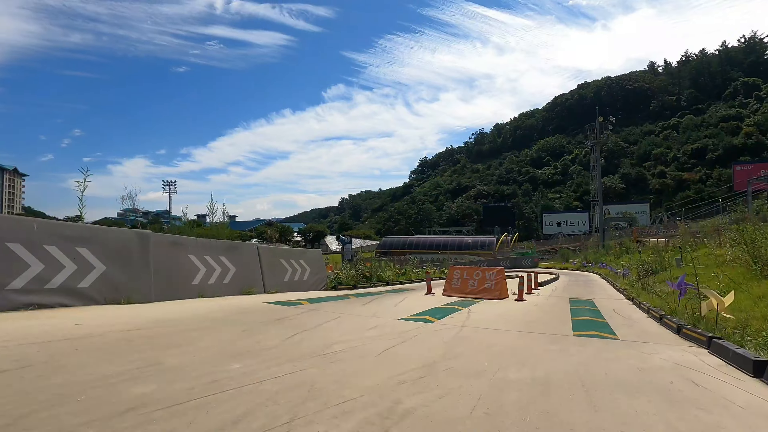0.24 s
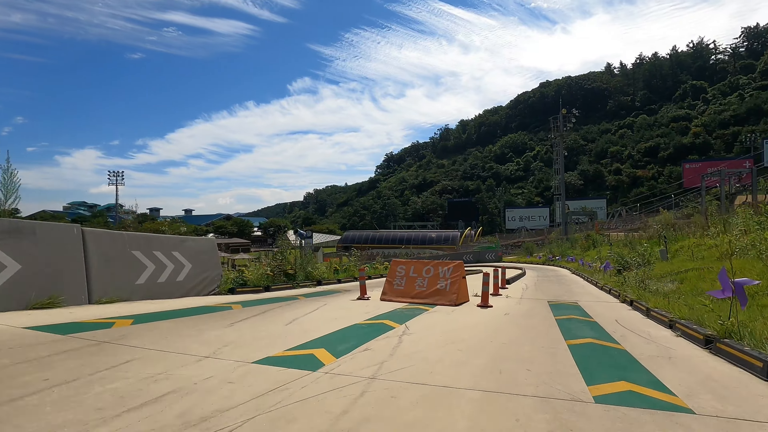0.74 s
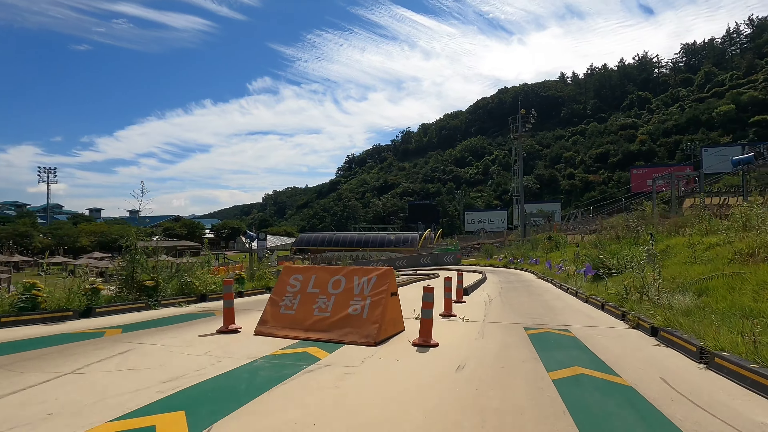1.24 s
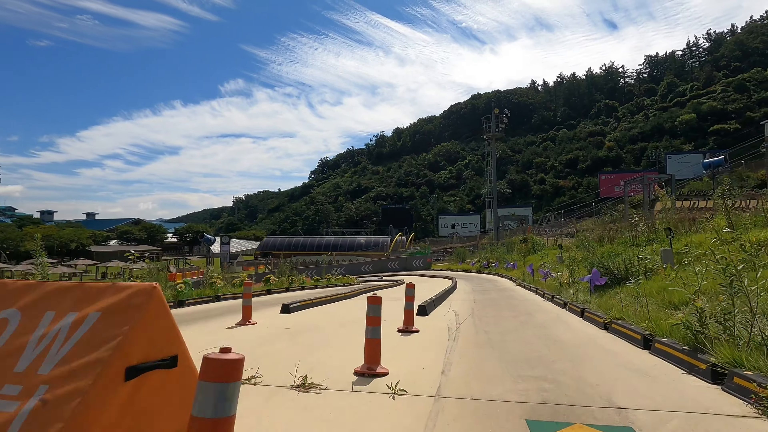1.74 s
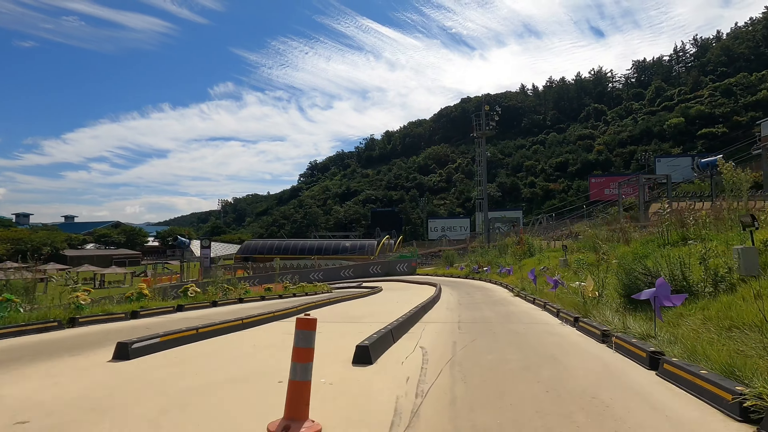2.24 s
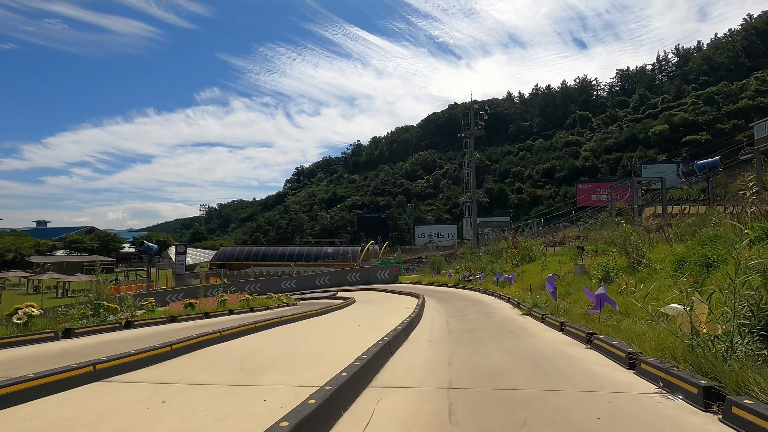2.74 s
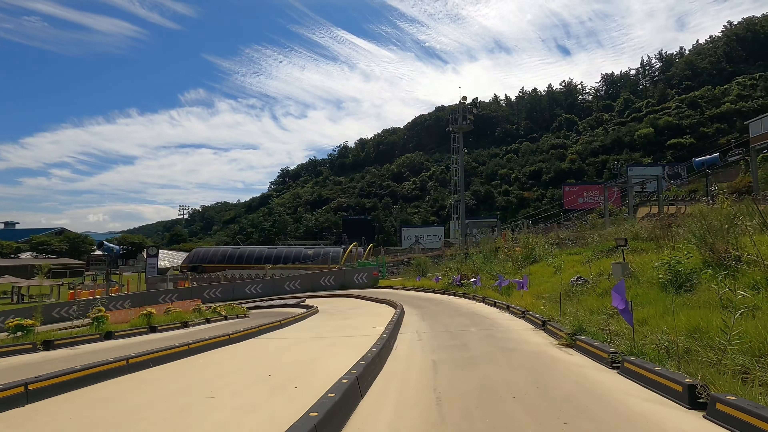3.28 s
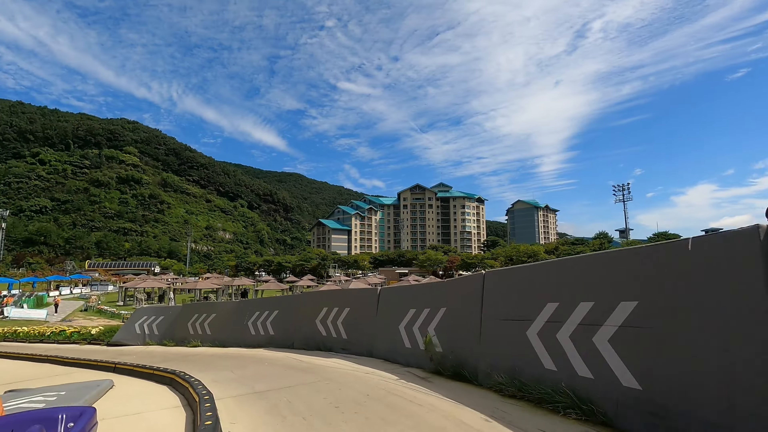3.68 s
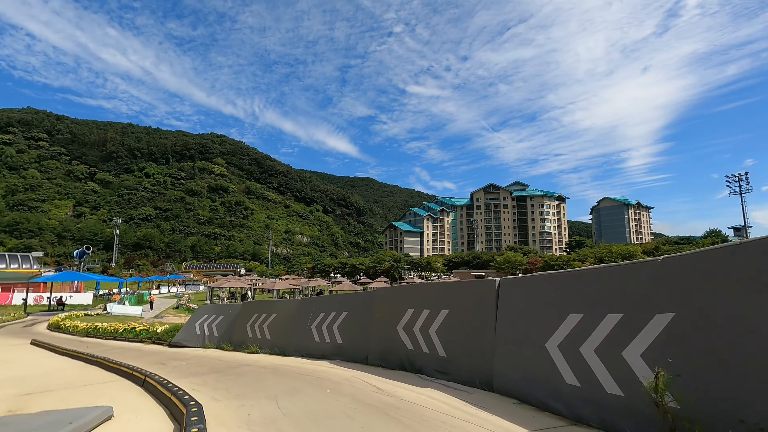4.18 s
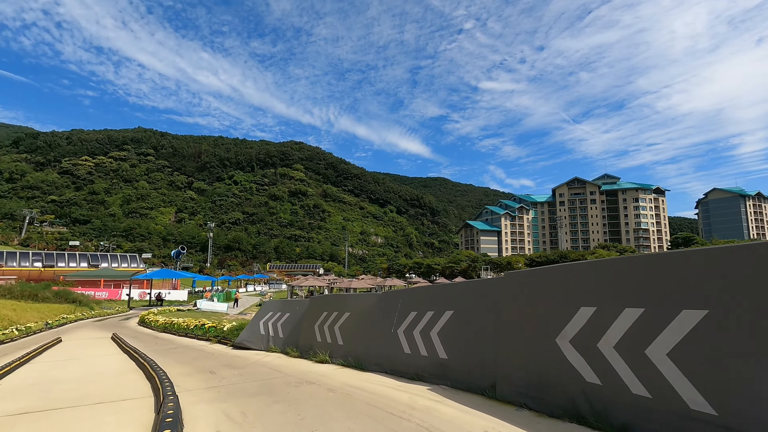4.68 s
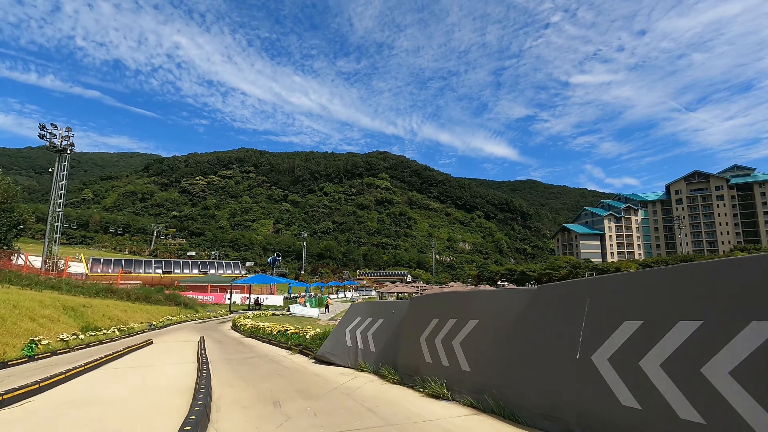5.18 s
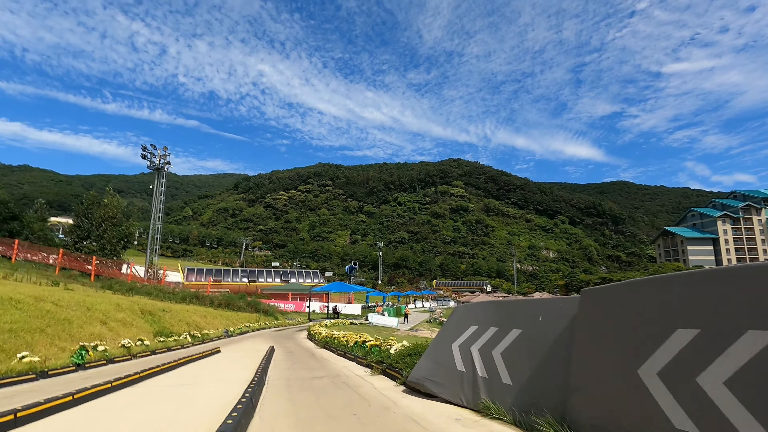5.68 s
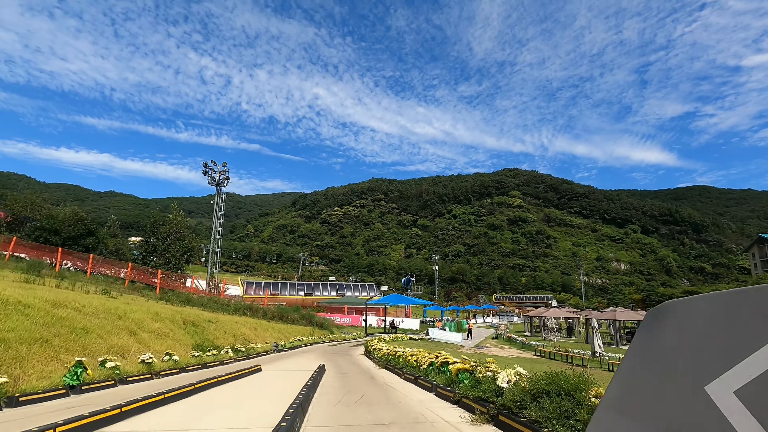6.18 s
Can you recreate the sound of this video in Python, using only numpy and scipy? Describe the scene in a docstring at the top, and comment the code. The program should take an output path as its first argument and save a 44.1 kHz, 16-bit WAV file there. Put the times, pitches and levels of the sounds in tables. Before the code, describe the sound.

From a microphone mounted on a small cart, a hollow plastic hull rumbles without pause over rough concrete outdoors, deep and fluctuating, with low wind buffeting, soft tyre hiss and a thin rush of air. At about 0.42 seconds the sound vanishes for a blink and returns with a click. A bump thuds at 0.6. A loose part taps about thirty times a second, faint at first, harder and brighter from 1.4, with tiny high chirps until 1.9. Rattle and jingle peak around 2.1 and 2.5, ease near 3, where two short lower squeaks sound at 3.1, then clatter again until 3.6. A lone tiny tick follows. Tapping then drops to about twenty-four per second and becomes faint and dull. Hollow thumps land near 4.2, 4.4, around 5.05 to 5.15, and 5.55 to 5.65. Rumbling, scattered knocks and faint squeaks continue to the abrupt end at 6.4.

```python
"""A hollow plastic hull rumbles as a small cart rolls down a concrete track, heard at a microphone fixed to it.
Ground roughness drives the hull's resonances and bumps make it thump; the tyres hiss as filtered noise.
A wheel taps a loose part twice a turn: short contacts strike damped modes; single knocks and a jingle join in.
A joint squeaks in gliding tones, air rushes, and low noise buffets the microphone.
The sound drops out briefly and comes back with a click; later there is a lone tick."""
import sys
import numpy as np
from scipy import signal
from scipy.io import wavfile
from scipy.ndimage import uniform_filter1d

SR = 44100
rng = np.random.default_rng(int(sys.argv[2]) if len(sys.argv) > 2 else 0)


def transcribe(signal):
    """Save signal, clipped to [-1, 1], as a 16-bit WAV file at the path in sys.argv[1]."""
    frames = np.atleast_2d(signal).T
    limited = np.clip(frames, -1, 1)
    pcm = np.round(limited * 32767).astype(np.int16)
    wavfile.write(sys.argv[1], SR, pcm)


def natural_amplitude(level_db):
    """Convert a level in decibels to a linear amplitude factor, elementwise."""
    exponent = np.asarray(level_db, float) / 20
    return 10 ** exponent


N = 283122
GAP_START_S, GAP_END_S = .4151, .4309

# Single knocks of the loose part, faint to loud, many in step with the wheel. Each row: time in
# seconds, strength in dB, then the extra share of the dull modes and of the bright modes in dB.
SINGLE_KNOCKS = [(0.036, -29.5, -5.5, -21.5), (0.2256, -26, 5.5, -26.5), (0.295, -35, 4, -20.5),
                 (0.357, -30, 4.5, -21), (0.4041, -32.5, 6, -10), (0.458, -31, -10.5, 0),
                 (0.5167, -25, 1.5, -24), (0.537, -32.5, -6.5, -1.5), (0.797, -34, 8, -26),
                 (0.863, -29, 9.5, -20), (0.93, -32, 6, -16), (1.017, -30, -12, -6.5),
                 (1.0667, -25, -1, -20), (1.133, -33.5, 4.5, -21.5), (1.2667, -27.5, 6, -25),
                 (1.3988, -21.5, 3.5, -21.5), (1.428, -28, -6, -3.5), (1.448, -26, -10.5, -4),
                 (1.53, -22.5, 2.5, -15.5), (1.56, -33, 5, 5), (1.5786, -33.5, -12, -13.5),
                 (1.698, -21, -7.5, -3.5), (1.764, -28, 1, -3.5), (1.831, -25, -4, 0),
                 (1.896, -29.5, -4.5, -5.5), (1.9625, -24, -8.5, -16.5), (2.0262, -20, 0, -2),
                 (2.058, -34, 14, 3.5), (2.0895, -31, -8.5, -14), (2.156, -28, 2.5, -18.5),
                 (2.2236, -22, -10.5, -6), (2.3884, -22, 4, -5), (2.4948, -24, -7, -11),
                 (2.4208, -29.5, 7, 4.5), (2.4753, -22, 5.5, -23), (2.514, -20, -11.5, -7),
                 (2.548, -17, -10.5, -7.5), (2.5635, -25.5, 3, 8), (2.585, -23.5, 10, -13),
                 (2.681, -23.5, -3, -11), (2.7425, -22, -7.5, -3), (2.809, -22.5, -0.5, 0),
                 (2.941, -29, -6.5, -12), (3.105, -32, 3.5, -17), (3.138, -23.5, -6.5, -5),
                 (3.169, -29, -4, -0.5), (3.249, -30, -9, -7.5), (3.301, -27, -7.5, -10.5),
                 (3.3328, -21.5, -2.5, -4), (3.3646, -21, -7.5, -1.5), (3.396, -24.5, 0.5, -2),
                 (3.463, -22.5, -6.5, -6.5), (3.53, -28.5, 0.5, -8), (3.562, -26, -1, -9),
                 (3.592, -25.5, -2.5, -1), (3.722, -47.5, 27, -6.5), (3.85, -37, 15, -20),
                 (4.012, -47, 0.5, -20), (3.766, -32, -4, -23), (4.112, -45, 30, -28),
                 (4.196, -26, 15.5, -22.5), (4.21, -30, 16.5, -24), (4.377, -39, 17.5, -18),
                 (4.456, -31, 11, -21.5), (4.621, -33, 3, -19.5), (4.7074, -30.5, 11.5, -25),
                 (4.8324, -27.5, 5.5, -8), (4.9234, -31.5, 2, 0), (4.974, -39, -5, -0.5),
                 (5.044, -21, 4, -10), (5.062, -31, 1, -14), (5.1274, -30.5, 6.5, -24.5),
                 (5.138, -32, 2.5, -27), (5.703, -55, 10, -7), (5.655, -32, 5.5, -13),
                 (5.7708, -32.5, 5.5, -13), (5.79, -27, 4, -8.5), (5.894, -30, 6.5, -5.5),
                 (6.0154, -32.5, 10.5, -21), (6.0682, -26.5, 1, -12.5)]
# Stretches of even wheel speed. Each row: first tap in seconds, taps per second,
# level of every second tap against the others in dB.
WHEEL_TURNS = [(.023, 29.3, -5), (.46, 29.67, -5), (1.398, 29.9, -1), (1.699, 30.6, -2), (2.680, 30.68, -1),
               (3.64, 23.45, 4), (5.132, 25.06, -3), (5.77, 24.35, 0)]


def rms_one(x):
    """Normalisation: scale to unit root-mean-square."""
    return x / np.sqrt(np.mean(x ** 2) + 1e-20)


def drift(rate_hz):
    """Random modulation: noise through a double one-pole low-pass, computed at SR / 20, of unit rms."""
    r = np.exp(-40 * np.pi * rate_hz / SR)
    noise = rng.standard_normal(N // 20 + 2002)
    slow = signal.lfilter([1], [1, -2 * r, r * r], noise)[2000:]   # without the filter's onset
    return np.interp(np.arange(N) / 20, np.arange(len(slow)), rms_one(slow))


def resonate(x, hz, width_hz):
    """Driven resonance: a pole pair whose radius sets the bandwidth, with gain 1 on top."""
    r = np.exp(-np.pi * width_hz / SR)
    poles = [1, -2 * r * np.cos(2 * np.pi * hz / SR), r * r]
    return signal.lfilter([(1 - r * r) / 2, 0, (r * r - 1) / 2], poles, x)


def ring(force, hz, t60):
    """Free vibration: each impulse of force starts a sine that decays by 60 dB in t60 seconds."""
    r, w = natural_amplitude(-60 / (t60 * SR)), 2 * np.pi * hz / SR
    return signal.lfilter([0, np.sin(w)], [1, -2 * r * np.cos(w), r * r], force)


def band(x, low_hz, high_hz):
    """Band limitation: a Butterworth band-pass."""
    return signal.sosfilt(signal.butter(2, [low_hz, high_hz], "band", fs=SR, output="sos"), x)


def hiss(spectrum, shake, shared_db, own_db):
    """Broadband noise: third-octave bands that flicker with a shared motion and on their own."""
    hz, db = np.transpose(spectrum)
    edges = hz[0] * 2 ** np.arange(0, np.log2(hz[-1] / hz[0]) + .01, 1 / 3)
    white = rng.standard_normal((2, N))   # neighbouring bands take different noise
    out = 0
    for k, (low, high) in enumerate(zip(edges, edges[1:])):
        level_db = np.interp(np.log(low * high) / 2, np.log(hz), db)
        level_db = level_db + shared_db * shake + own_db * drift(7.9)
        out = out + natural_amplitude(level_db) * band(white[k % 2], low, high)
    return rms_one(out)


def air_rush(shake):
    """Flow noise: a rush of air, steady in its mean level."""
    # Each row: frequency in Hz, relative density in dB per Hz.
    air_spectrum = [(2000, -11.5), (2800, -1), (3600, -6), (4900, -6.5), (5600, -10.5), (6700, -5.5),
                    (7600, -7.5), (8300, -23.5), (9500, -24.5), (12000, -43), (16000, -38)]
    return natural_amplitude(-57.5) * hiss(air_spectrum, shake, shared_db=0.5, own_db=4.0)


def buffeting(now):
    """Turbulent pressure on the microphone: low noise with one resonance; returns gain and unit-rms sound."""
    # Each row: time in seconds, level in dB.
    buffet_levels = [(0, -20.5), (2.2, -21), (3.0, -22), (3.8, -22.5), (4.8, -23.5), (6.42, -22)]
    gusts = rng.standard_normal(N)
    sound = band(gusts, low_hz=21.9, high_hz=106) + 0.49 * resonate(gusts, hz=49.4, width_hz=18.0)
    return natural_amplitude(np.interp(now, *np.transpose(buffet_levels))), rms_one(sound)


def squeaks():
    """Stick-slip friction: the joint chirps in gliding, wavering tones with a fluttering level."""
    # Each row: start in seconds, length in seconds, start and end pitch in Hz before the waver,
    # level in dB before the flutter.
    chirps = [(.14, .045, 1300, 1650, -47), (1.315, .028, 4250, 3750, -56), (1.465, .03, 3950, 3750, -53),
              (1.525, .035, 4150, 3800, -52), (1.595, .04, 4150, 3800, -52), (1.67, .035, 4250, 3850, -50),
              (1.735, .04, 4150, 3850, -50), (1.81, .03, 4100, 4000, -55), (1.875, .03, 4150, 4000, -58),
              (2.025, .035, 7400, 7450, -57), (2.125, .03, 7450, 7400, -60), (2.51, .04, 7350, 7400, -54),
              (3.095, .025, 1050, 1250, -34), (3.12, .028, 1400, 1600, -33), (3.82, .055, 7300, 7380, -58),
              (3.885, .045, 7330, 7400, -60), (5.89, .045, 7300, 7400, -63), (6.06, .05, 7450, 7500, -63)]
    out = np.zeros(N)
    flutter = 1 + 0.5 * drift(90)
    waver = 1 + .004 * drift(120)   # factor on the pitch
    for s, length, start_hz, end_hz, db in chirps:
        i, n = int(s * SR), int(length * SR)
        pitch_hz = np.linspace(start_hz, end_hz, n) * waver[i:i + n]
        phase = 2 * np.pi * np.cumsum(pitch_hz) / SR
        out[i:i + n] += natural_amplitude(db) * np.hanning(n) ** .5 * np.sin(phase)
    return out * flutter


def beat():
    """Periodic modulation: a cosine that peaks 2.8 ms after each nominal tap of the wheel."""
    first_s, rate, _ = np.transpose(WHEEL_TURNS)
    now = np.arange(N) / SR - 0.0028
    k = np.maximum(np.searchsorted(first_s, now) - 1, 0)
    return np.cos(2 * np.pi * rate[k] * (now - first_s[k]))


def jingle(jingle_db, shake):
    """Broadband noise for the loose part's jingle: its level swells with each half turn of the wheel."""
    # Each row: frequency in Hz, relative density in dB per Hz.
    jingle_spectrum = [(1300, -9), (1600, -6), (2300, -6), (2750, -4), (3300, -7.5), (4200, -9),
                       (4900, -10.5), (5600, -15), (6700, -15.5), (7700, -25), (8400, -40), (9500, -52)]
    return natural_amplitude(jingle_db + 3 * beat()) * hiss(jingle_spectrum, shake, shared_db=1.5, own_db=1.5)


def tyre_hiss(tyre_db, lumps):
    """Rolling noise: the tyres' hiss follows the uneven ground and each half turn of the wheel."""
    # Each row: frequency in Hz, relative density in dB per Hz.
    tyre_spectrum = [(600, -6), (750, 5.5), (1000, 1), (1300, -2), (1700, -20), (2200, -36), (2600, -40)]
    return natural_amplitude(tyre_db + 4 * beat()) * hiss(tyre_spectrum, lumps, shared_db=2.2, own_db=2.5)


def taps():
    """Periodic impact: rows like SINGLE_KNOCKS; harder taps are brighter, a nearby knock replaces a tap."""
    # How hard the wheel taps. Each row: time in seconds, strength in dB.
    tap_effort = [(0, -38), (.4, -37), (.9, -34), (1.35, -32), (1.75, -25.5), (2.2, -25), (2.3, -28.5),
                  (2.55, -23), (2.7, -27.5), (2.95, -36), (3.25, -32), (3.38, -24), (3.6, -25), (3.65, -38),
                  (5.05, -38), (5.3, -44), (5.55, -40), (6.42, -39)]
    ends = [row[0] for row in WHEEL_TURNS[1:]] + [N / SR]
    times, second_db = [], []
    for (first_s, rate, db), end in zip(WHEEL_TURNS, ends):
        for k in range(round((end - first_s) * rate)):
            times.append(first_s + k / rate)
            second_db.append(db * (k % 2))
    s = np.array(times)
    chance = rng.standard_normal((len(s), 4))
    effort_db = np.interp(s, *np.transpose(tap_effort))
    over_db = effort_db + 30   # strength above -30 dB
    rows = np.transpose([s + .0012 * chance[:, 0],   # jitter in seconds
                         effort_db + second_db + 1.5 * chance[:, 1],
                         2.5 - .8 * over_db + 1.5 * chance[:, 2],
                         -11 + .7 * over_db + 1.5 * chance[:, 3]])
    free = abs(s[:, None] - np.transpose(SINGLE_KNOCKS)[0]).min(axis=1) > .013   # seconds to a knock
    return rows[free & (s < N / SR - .065)]


def knocks(jingle_db):
    """Modal impact: chattering contacts of taps and knocks strike every mode; faint strays fill in."""
    # Each row: frequency in Hz, relative level in dB, 60 dB decay time in seconds.
    ringing_modes = [(487, 0.5, 0.053), (586, -2.5, 0.056), (777.5, -4.5, 0.064), (902, -4.5, 0.029),
                     (1054, -10, 0.044), (1247, -5.5, 0.033), (1612, -5.5, 0.022), (1847, -6, 0.018),
                     (2155, -6, 0.02), (2472, -8.5, 0.014), (2720, -9, 0.014), (3216, -1.5, 0.0055),
                     (3676, -3, 0.006), (4080, -8, 0.016), (4740, -4, 0.003), (5460, -13, 0.01),
                     (6000, -18.5, 0.0043), (7350, -15.5, 0.01), (9300, -15, 0.0026)]
    dull_below_hz, bright_above_hz = 1200, 3000
    scrape_s, settle_s, settle_share = .0025, .02, .3
    strays_per_s, gain_db, luck_db = 20, -2.5, 1.0
    s, strength_db, dull_db, bright_db = np.vstack([SINGLE_KNOCKS, taps()]).T

    t = np.arange(int(.06 * SR)) / SR
    scrape = t / scrape_s * np.exp(-t / scrape_s)
    settle = settle_share * np.exp(-t / settle_s) * (t > scrape_s)   # the part settles
    shape = scrape + settle
    contact = rng.standard_normal((len(s), len(t))) * shape
    contact /= np.linalg.norm(contact, axis=1, keepdims=True)
    luck = rng.standard_normal((len(s), len(ringing_modes)))
    span = ((s - scrape_s) * SR).astype(int)[:, None] + np.arange(len(t))

    stray_db = jingle_db + 3 + 3.5 * np.minimum(rng.exponential(1, N), 3)
    hits = (rng.random(N) < strays_per_s / SR) * natural_amplitude(stray_db)
    strays = signal.fftconvolve(hits, shape / np.linalg.norm(shape))[:N] * rng.standard_normal(N)

    out = np.zeros(N)
    for k, (hz, db, t60) in enumerate(ringing_modes):
        share_db = dull_db if hz < dull_below_hz else bright_db if hz > bright_above_hz else 0
        force = strays * natural_amplitude(db + np.mean(share_db)) + 1e-18
        # the contact's spectrum at this mode, divided out; the floor limits the boost
        reach = np.maximum(abs(contact @ np.exp(-2j * np.pi * hz * t)), .5)
        strength = natural_amplitude(strength_db + share_db + db + gain_db + luck_db * luck[:, k]) / reach
        np.add.at(force, span, contact * strength[:, None])
        out += (-1) ** k * ring(force, hz, t60)
    return out


def thumps():
    """Impulse response: a bump sets the hull's panels ringing for a few cycles, each time in another mix."""
    # Each row: time in seconds, relative strength in dB.
    bumps = [(0.595, -12), (1.067, -27), (2.417, -16.5), (3.723, -30), (4.2, -6), (4.379, -17),
             (4.459, -13), (4.922, -14.5), (5.044, -15.5), (5.055, -7), (5.137, -7), (5.55, -13),
             (5.621, -11), (5.655, -15.5)]
    # Each row: frequency in Hz, relative level in dB, 60 dB decay time in seconds.
    panel_modes = [(270, -2, 0.038), (361.5, -2, 0.048), (410, 4.5, 0.028)]
    s, db = np.transpose(bumps)
    luck = rng.standard_normal((len(s), len(panel_modes)))
    out = np.zeros(N)
    for k, (hz, mode_db, t60) in enumerate(panel_modes):
        push = np.full(N, 1e-18)
        push[(s * SR).astype(int)] = natural_amplitude(db + mode_db - 1.5 + 1.7 * luck[:, k])
        out += ring(push, hz, t60)
    return band(out, low_hz=179, high_hz=895)


def hull(modes, wander_db, edge_hz):
    """Forced vibration: ground roughness drives each resonance, whose level wanders by wander_db."""
    ground = rng.standard_normal(N)
    out = np.zeros(N)
    for k, (hz, width_hz, db) in enumerate(modes):
        level = natural_amplitude(db + wander_db * drift(0.96))
        out += (-1) ** k * level * resonate(ground, hz, width_hz)
    return rms_one(band(band(out, *edge_hz), *edge_hz))


def rumble(now, low_db, side_db, upper_db, lumps):
    """Superposed resonances of the hull: returns the gains and unit-rms sounds of its four groups."""
    # Each row of the four groups: frequency in Hz, width in Hz, relative level in dB.
    low_modes = [(116.5, 27, -2.5), (136.3, 17.4, 3.5)]
    mid_modes = [(172.7, 20, 0)]
    side_modes = [(201.4, 25, -3), (256.15, 23.4, 1.2)]
    high_modes = [(293.6, 31.8, 2), (341.8, 50.5, 1), (448, 46.3, -2.5), (517, 79, -7), (598, 170, -13.5),
                  (758, 90, -19.5)]
    # Share of the middle resonance. Each row: time in seconds, level against the low group in dB.
    mid_share = [(0, -6.5), (.9, -2), (1.7, -6), (2.4, -6), (2.65, 0.5), (3.3, 5), (3.6, -1), (4.5, 0.5),
                 (5.2, -2.5), (6.42, -4)]
    mid_db = np.interp(now, *np.transpose(mid_share))
    gains = [natural_amplitude(low_db), natural_amplitude(low_db + mid_db), natural_amplitude(low_db + side_db),
             natural_amplitude(low_db + upper_db + 1.3 * lumps)]
    sounds = [hull(low_modes, wander_db=2.0, edge_hz=(95, 280)),
              hull(mid_modes, wander_db=2.5, edge_hz=(95, 280)),
              hull(side_modes, wander_db=0.0, edge_hz=(140, 360)),
              hull(high_modes, wander_db=1.5, edge_hz=(230, 1100))]
    return gains, sounds


def crest_after_gap(gains, parts):
    """Phase alignment: time-shifts the low parts from the gap's end on, so that a crest comes first."""
    back = round(GAP_END_S * SR)
    lag = 3010 - np.argmax(gains[:, back] @ parts[:, back - 3000:back])
    return np.where(np.arange(N) < back, parts, np.roll(parts, lag, axis=1))


def scene():
    """Superposition: all parts of the cart add up at the one microphone."""
    # The ride. Each row: time in seconds, level of the hull's low group in dB, shares of its side
    # and upper groups against the low group in dB, level of the tyre hiss in dB before its swells.
    ride = [(0, -13, -7, -11.5, -41), (0.151, -15, -6, -12.5, -47.5), (.5, -21, 0.5, -3.5, -46.5),
            (.8, -19, 1, -2, -42), (1.2, -18, -0.5, -2, -40), (1.5, -14, -10.5, -6, -39.5),
            (1.851, -18, 1, -5.5, -42.5), (2.299, -12.5, -3, -7, -42.5), (2.56, -19, -1.5, 0, -36.5),
            (2.95, -20, 1, -1.5, -40), (3.301, -22, 1, 3, -44), (3.59, -17, 1, -1.5, -39),
            (3.77, -18.5, -1, -2, -40.5), (3.951, -16, 6, -3, -37), (4.3, -17, 0.5, -5.5, -43.5),
            (4.649, -15.5, -6.5, -5.5, -40), (4.949, -15, 1.5, -5.5, -38.5), (5.149, -16.5, -0.5, -5, -42),
            (5.35, -21.5, 4.5, -3.5, -45), (5.601, -15.5, -2.5, -7, -37), (5.85, -14.5, -5, -4, -42.5),
            (6.1, -17.5, 1, -4.5, -39.5), (6.301, -17, 2, -1.5, -39.5), (6.42, -19, 1.5, -2, -33)]
    # Each row: time in seconds, level of the jingle in dB before its swells.
    jingle_levels = [(0, -76), (.4, -59), (.9, -55.5), (1.35, -53), (1.75, -55), (2.1, -45), (2.3, -50),
                     (2.56, -40.5), (2.7, -52.5), (2.95, -57), (3.25, -50), (3.59, -54), (3.9, -50.5),
                     (4.4, -62), (5.05, -56), (5.3, -77), (5.55, -57), (6.05, -54.5), (6.42, -61)]
    now = np.arange(N) / SR
    s, *columns = np.transpose(ride)
    low_db, side_db, upper_db, tyre_db = [np.interp(now, s, c) for c in columns]
    jingle_db = np.interp(now, *np.transpose(jingle_levels))
    shake = rms_one(drift(18) + .7 * drift(35))
    lumps = rms_one(drift(17) + .5 * shake)   # the ground is uneven under the wheels

    buffet_gain, buffet = buffeting(now)
    hull_gains, hull_sounds = rumble(now, low_db, side_db, upper_db, lumps)
    gains = np.array([*hull_gains, buffet_gain])
    parts = crest_after_gap(gains, np.array([*hull_sounds, buffet]))

    out = np.sum(gains * parts, axis=0)
    out += air_rush(shake)
    out += squeaks()
    out += jingle(jingle_db, shake)
    out += tyre_hiss(tyre_db, lumps)
    out += knocks(jingle_db)
    out += thumps()
    return out[None]


def low_pass(x):
    """Removes everything above the highest recorded frequency."""
    return signal.sosfilt(signal.butter(12, 15720, fs=SR, output="sos"), x)


def record(dry):
    """Compression, saturation and low-pass filtering; then a gap that ends in a click, and a lone tick."""
    # gain control: takes back a third of each departure from -14 dB, averaged over 25 ms
    level_db = 10 * np.log10(uniform_filter1d(dry ** 2, round(.025 * SR)) + 1e-9)
    evened = dry * natural_amplitude(-.33 * (level_db + 14))
    x = 0.93 * np.tanh(evened / 1.064)   # rounds the peaks
    x = signal.sosfilt(signal.butter(5, 7270, fs=SR, output="sos"), x)   # the treble falls away steeply

    out, back = round(GAP_START_S * SR), round(GAP_END_S * SR)
    x[:, out - 25:out] *= np.linspace(1, 0, 25)
    x[:, out:back] = 0
    x[:, back:back + 8] *= np.linspace(.3, 1, 8)
    x[:, back] += natural_amplitude(-17.5)   # click
    x[:, round(3.5975 * SR)] += natural_amplitude(-28)   # tick
    return low_pass(x)


dry = scene()
out = record(dry)
transcribe(out)
```